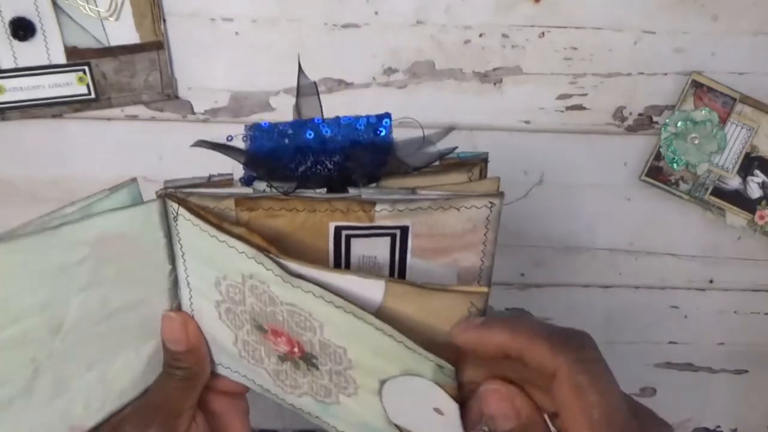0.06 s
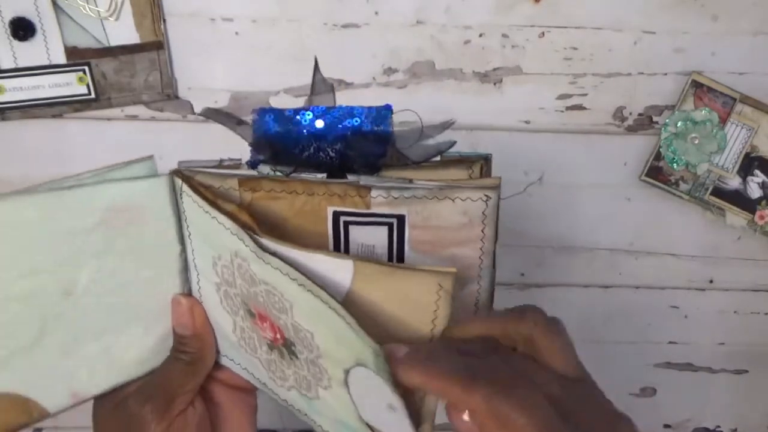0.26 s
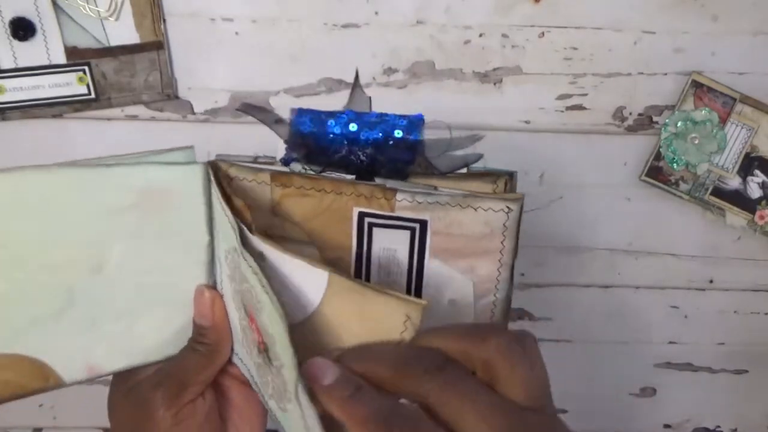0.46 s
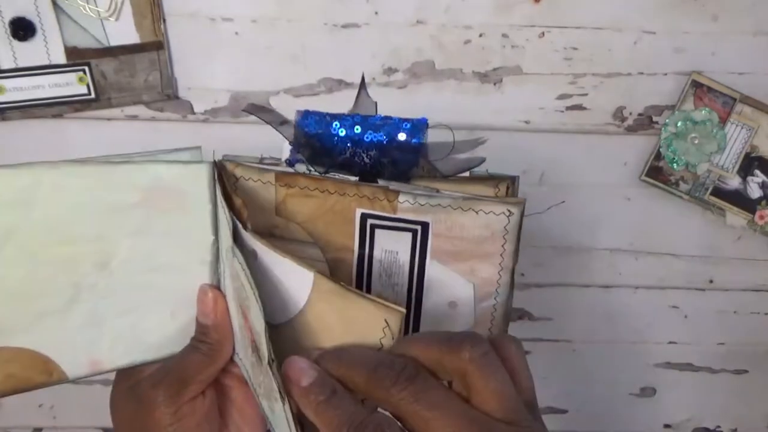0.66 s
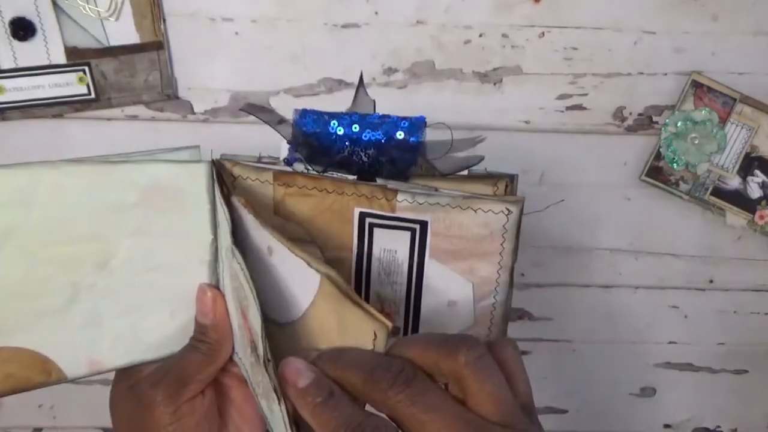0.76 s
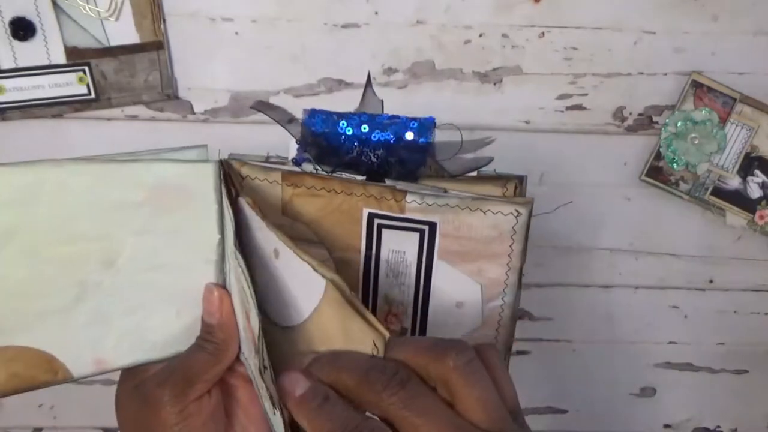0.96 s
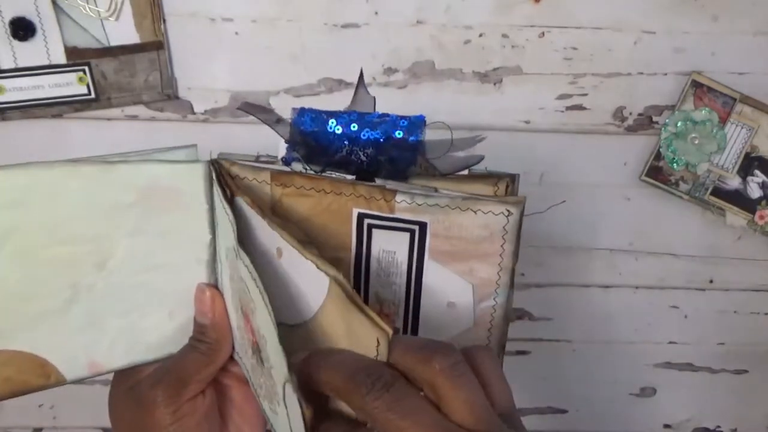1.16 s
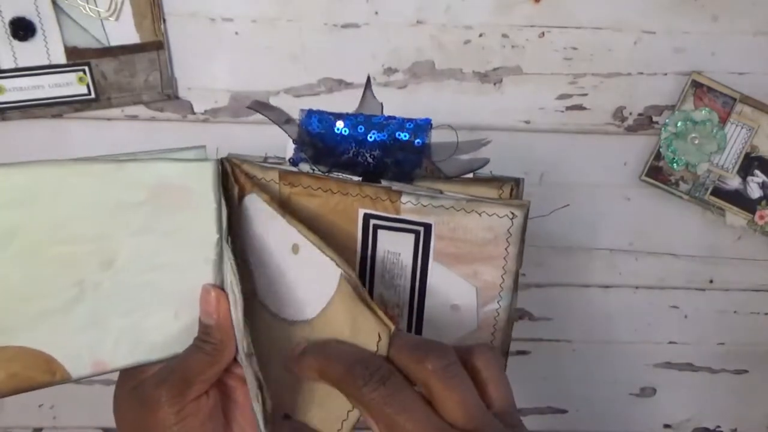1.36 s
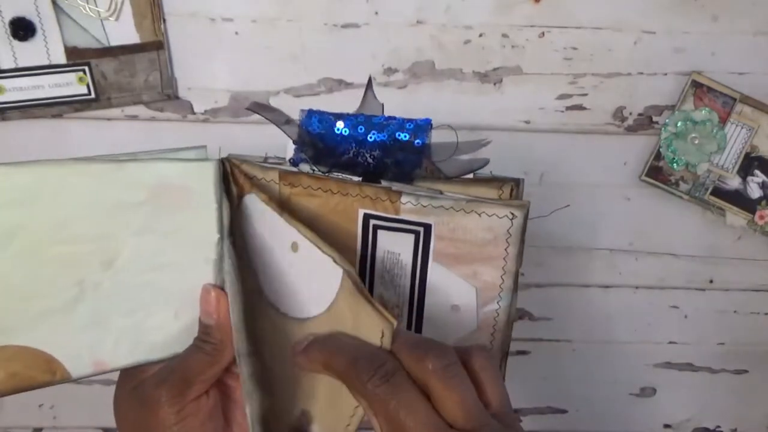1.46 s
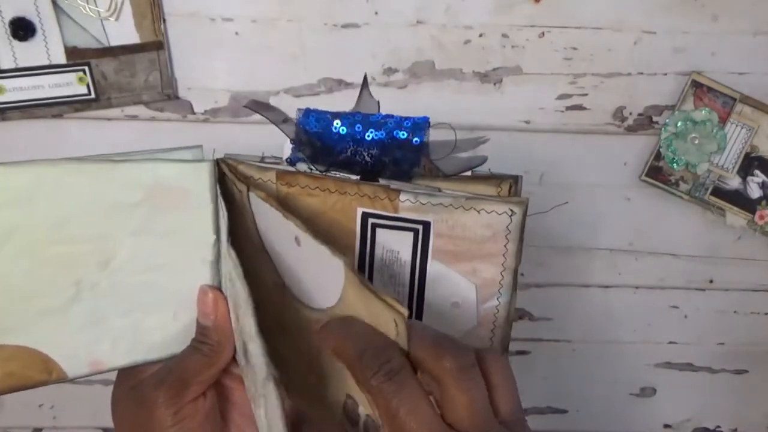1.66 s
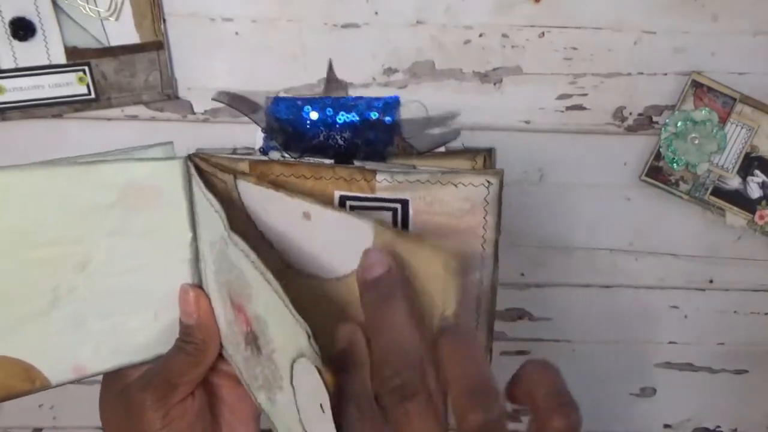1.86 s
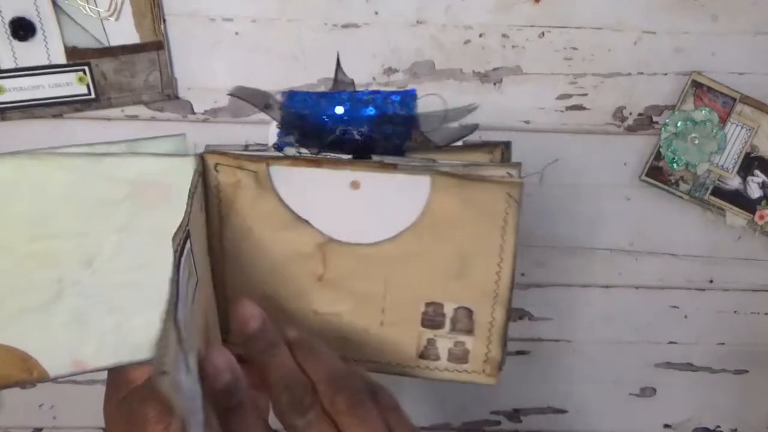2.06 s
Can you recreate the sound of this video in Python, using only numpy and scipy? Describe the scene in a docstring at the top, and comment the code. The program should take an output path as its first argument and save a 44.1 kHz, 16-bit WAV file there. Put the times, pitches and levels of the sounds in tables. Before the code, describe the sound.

Thick journal paper rustles under hands. A short brushing stroke opens, then soft rubbing with a light snap at 0.4 s. A tight crisp crackle comes at 0.75-0.83 s, then quiet sliding. From 1.23 s creases tick, growing into dense snaps, knocks and hissy rubs at 1.37-1.6 s. Faint sliding follows until a bright flick near 2 s and a soft low thump. Small room, close phone, faint hum.

```python
"""Thick paper pages and flaps of a journal are rubbed, flipped and folded by hand under a phone in a small room.
Sliding strokes are dense random grains through resonances: dull scrape, sheet, fine hiss; some sing on one note.
Creases snap as clicks with ragged tails that ring the sheet; covers and flaps knock as decaying sines.
Noise tails make the room; shaped noise makes the air rumble and narrow noise a wavering hum."""
import sys
import numpy as np
from scipy import signal
from scipy.fft import rfft, irfft
from scipy.io import wavfile
from scipy.ndimage import uniform_filter1d

SR = 44100
rng = np.random.default_rng(int(sys.argv[2]) if len(sys.argv) > 2 else 0)


def log_audio(samples):
    """Write samples as a 16-bit WAV file to the path given in sys.argv[1]."""
    # one column per channel
    frames = np.atleast_2d(samples).T
    # limit to full scale, then quantise
    limited = np.clip(frames, -1, 1)
    pcm = np.round(limited * 32767).astype(np.int16)
    wavfile.write(sys.argv[1], SR, pcm)


N = 92786


def undb(db):
    """dB to amplitude gain."""
    return 10 ** (np.asarray(db) / 20)


def unit(x):
    """Scaled to rms 1."""
    return x / np.sqrt(np.mean(x ** 2))


def band(x, hz, width_hz):
    """Two-pole resonance, gain 1 at the centre."""
    q = hz / max(width_hz, 1.)
    b, a = signal.iirpeak(min(hz, .45 * SR), q, SR)
    return signal.lfilter(b, a, x)


def walk(rate_hz):
    """Random levels held 1 / rate_hz s and slewed; rms 1."""
    k = int(SR / rate_hz)
    levels = rng.standard_normal(N)[:N // k + 1]
    return unit(uniform_filter1d(np.repeat(levels, k), k)[:N])


GRAINS_PER_S, GRAIN_SPREAD_DB = 9000, 2.0
FLICKER_DB, FLICKER_RATE_HZ = 1.54, 60.09


def grains():
    """Fibres catching and letting go: dense tiny clicks of uneven size."""
    happens = rng.random(N) < GRAINS_PER_S / SR
    size = undb(GRAIN_SPREAD_DB * rng.exponential(size=N))
    sign = np.sign(rng.standard_normal(N))
    return unit(happens * sign * size) * undb(FLICKER_DB * walk(FLICKER_RATE_HZ))


def grain_band(hz, width_hz):
    """Fresh grains through three stacked resonances, for steep skirts; rms 1."""
    x = band(grains(), hz, width_hz)
    x = band(x, hz, 2.08 * width_hz)
    return unit(band(x, hz, 2.57 * width_hz))


# Sliding strokes. Each row: start of full level in seconds, swell in ms, hold in ms, fade in ms,
# dull scrape in Hz, scrape level in dB, sheet resonance in Hz, sheet level in dB, fine hiss level in dB.
STROKES = [(0.0, 20, 66, 43, 1590, -51.5, 3800, -43.5, -41.5),
           (.155, 51, 18, 54, 1420, -58.5, 3620, -56, -52.5),
           (.215, 12, 8.3, 9.6, 1400, -68, 3970, -56, -48.5),
           (.265, 52, 37, 18, 1000, -58, 3400, -46, -45.5), (0.31, 12, 20, 59, 975, -56, 3660, -46, -42.5),
           (.375, 99, 33, 88, 1450, -53, 3560, -45, -46.5),
           (0.451, 33, 66, 160, 1380, -54.5, 3070, -52.5, -60.5),
           (.55, 56, 31, 18, 1290, -62, 3100, -66, -85),
           (0.622, 5.6, 99, 19, 1220, -51, 2780, -55.5, -62.5),
           (.752, 4.8, 18.2, 17, 915, -39, 4000, -40.5, -39),
           (0.829, 17, 20, 126, 1070, -56, 4480, -47.5, -38.5),
           (1.02, 33, 17, 77, 1240, -63, 2980, -55.5, -53.5),
           (1.119, 175, 77, 140, 1300, -63, 3150, -52.5, -43.5),
           (1.24, 19, 32, 72, 1020, -58, 2980, -58, -60),
           (1.291, 74, 56, 42, 1320, -58, 4200, -54.5, -53.5),
           (1.368, 20, 34, 92, 1110, -44.5, 4260, -49, -43.5),
           (1.45, 18, 5.3, 28, 1200, -43.5, 4000, -47, -44),
           (1.477, 26, 19.5, 22, 940, -44, 4700, -44.5, -36.5),
           (1.535, 52, 35, 65, 1340, -41.5, 4670, -37.5, -35),
           (1.565, 14, 5.9, 120, 1730, -42.5, 3900, -49, -40.5),
           (1.756, 103, 78, 76, 1560, -60.5, 3770, -59, -44),
           (1.851, 14, 22.4, 52, 1720, -55, 4100, -57, -44),
           (1.971, 57, 18, 13, 1200, -71, 4500, -57.5, -53.5),
           (1.9872, 1.0, 8.4, 5, 1900, -51, 5070, -28, -24.5),
           (2.0, 4.5, 8.7, 117, 1490, -54.5, 4960, -40.5, -40)]
STROKE_EDGE_DB = -28  # level one swell before the hold, one fade after it
SCRAPE_WIDTH, SHEET_WIDTH = 1, 0.62  # shares of the resonance
HISS_HZ, HISS_WIDTH_HZ = 8510, 3470


def rubbing():
    """Each stroke swells, holds and fades; its grains sound dull, in the sheet and fine."""
    t, low, high = np.arange(N) / SR, 0, 0
    hiss = grain_band(HISS_HZ, HISS_WIDTH_HZ)
    for start_s, swell_ms, hold_ms, fade_ms, scrape_hz, scrape_db, sheet_hz, sheet_db, hiss_db in STROKES:
        before = 1000 * (start_s - t) / max(swell_ms, 1.)
        after = (1000 * (t - start_s) - hold_ms) / max(fade_ms, 1.)
        env = undb(STROKE_EDGE_DB * np.maximum(np.maximum(before, after), 0))
        scrape = undb(scrape_db) * grain_band(scrape_hz, SCRAPE_WIDTH * scrape_hz)
        sheet = undb(sheet_db) * grain_band(sheet_hz, SHEET_WIDTH * sheet_hz)
        low = low + env * (scrape + sheet)
        high = high + env * undb(hiss_db) * hiss
    return low, high


# Narrow notes of the sheet under the fingers. Each row: start in seconds, length in ms, note in Hz, level in dB.
SINGING = [(.262, 52, 2960, -55.5), (.31, 31, 2995, -50), (.383, 30, 3030, -50), (1.56, 17.5, 2000, -39.5),
           (2.003, 18, 5770, -33)]
SINGING_WIDTH = 0.025  # share of the note


def singing():
    """Sliding grains feed one narrow mode of the taut sheet for a moment."""
    t, out = np.arange(N) / SR, 0
    for start_s, length_ms, hz, db in SINGING:
        phase = np.clip(1000 * (t - start_s) / length_ms, 0, 1)
        env = np.sin(np.pi * phase) ** .5
        note = unit(band(grains(), hz, SINGING_WIDTH * hz))
        out = out + undb(db) * env * note
    return out


def peak_unit(x):
    """Scaled so the loudest 50-sample stretch has rms 1."""
    return x / np.sqrt(uniform_filter1d(x ** 2, size=50).max())


# Creases snapping. Each row: nominal time in seconds, crack level in dB before CRACK_TRIM_DB,
# low ring in Hz, its level in dB before RING_TRIM_DB, high ring in Hz, its level in dB before RING_TRIM_DB,
# nominal length in ms (the tail's decay time is LENGTH_SHARE of it).
SNAPS = [(0.0648, -55, 1160, -46, 4220, -40.5, 4.4), (0.2234, -43.5, 2380, -52.5, 4150, -48.5, 3.2),
         (0.3896, -46, 1560, -48, 3150, -39, 1.1), (0.4006, -30.5, 1490, -35, 3170, -39, 1.94),
         (0.4087, -54, 1460, -44, 3100, -43, 2.4), (0.582, -53.5, 1510, -50.5, 3480, -51, 1.1),
         (0.7266, -57, 1350, -48, 2660, -42.5, 3.1), (0.7312, -58, 1340, -42, 2840, -43, 0.92),
         (0.7535, -32.5, 1540, -35, 2660, -38, 3.9), (0.7557, -34, 1600, -43, 2780, -37, 1.8),
         (0.7621, -60, 1030, -32, 1490, -33, 0.5), (0.7628, -28, 665, -40, 2800, -33, 0.4),
         (0.7651, -25, 970, -49, 4760, -37.5, 0.36), (0.769, -30, 1450, -34, 4470, -38, 0.92),
         (0.7752, -46, 682, -45, 1300, -45, 0.49), (0.8129, -28, 1600, -47, 2740, -44, 0.59),
         (0.8157, -27, 1000, -47, 6100, -41, 0.31), (0.8163, -22, 1790, -42, 4520, -40, 0.3),
         (0.8174, -16, 1460, -37, 2800, -34.5, 0.42), (0.8203, -21.5, 1570, -45, 2950, -35, 0.32),
         (0.8252, -15.5, 1440, -38, 2920, -30.5, 0.34), (0.831, -28, 1140, -41, 5400, -39, 0.6),
         (1.2285, -33, 1670, -44, 2710, -53, 0.71), (1.2384, -57, 970, -42.5, 3230, -51, 2.1),
         (1.2786, -34.5, 1567, -45, 2800, -49.5, 0.75), (1.281, -30, 2410, -52, 2730, -40, 0.37),
         (1.298, -26, 2350, -46, 2830, -43, 1.7), (1.3384, -32.5, 2390, -53, 2760, -45, 0.43),
         (1.3588, -38, 520, -65, 5150, -40, 1.7), (1.3616, -41, 466, -41, 4260, -45, 1.8),
         (1.3675, -31, 526, -64, 4100, -36, 1.3), (1.3776, -17, 1200, -28.5, 2700, -28.5, 0.84),
         (1.3777, -29.5, 1950, -31, 4170, -25.5, 0.56), (1.3778, -40, 5530, -25.5, 10000, -20.5, 1.2),
         (1.3879, -34, 1220, -50, 3100, -38, 2.0), (1.3974, -26.5, 1910, -38, 4080, -37.5, 1.4),
         (1.4477, -53, 1290, -44, 2410, -41, 1), (1.452, -26, 1800, -43, 4400, -35.5, 1.1),
         (1.464, -48, 1010, -32.5, 2410, -48, 1.4), (1.4729, -22, 1740, -26.5, 4420, -18.5, 0.29),
         (1.473, -42, 5330, -40, 7260, -14.5, 0.67), (1.4758, -20.5, 670, -36, 4260, -57, 0.18),
         (1.4852, -33, 2100, -31, 4630, -50, 0.55), (1.5097, -34, 750, -41.5, 5120, -41, 0.45),
         (1.5204, -25, 1640, -60, 5040, -46, 0.62), (1.5233, -18, 1530, -28.5, 5100, -23.5, 1.25),
         (1.5267, -17.5, 2030, -29, 2870, -35, 1.8), (1.5397, -36, 2120, -26.5, 5200, -28, 2.4),
         (1.572, -41, 1900, -41, 4300, -28, 4.5), (1.5775, -32, 1700, -29, 3120, -29, 1.25),
         (1.586, -37, 1860, -41, 2980, -43, 1.4), (1.86, -43, 2000, -54, 4200, -44.5, 1.5),
         (1.8637, -33.5, 2410, -45, 2600, -46, 1.9), (1.9467, -50, 1600, -51, 3220, -54, 0.39),
         (1.9879, -22, 4260, -21.5, 7420, -22, 2.8), (1.991, -24, 2140, -37.5, 5600, -20.5, 6.6),
         (1.9926, -32, 1520, -35.5, 5720, -16, .7), (1.9957, -27, 4320, -24, 5950, -20, 1.8),
         (2.003, -34, 2280, -46, 5760, -26, 1.3), (2.0157, -36, 1770, -66, 5500, -34, 0.69),
         (2.0418, -52, 700, -54, 4770, -36, 0.5)]
SNAP_SAMPLES, SNAP_LATE_S = 2048, .0003
CRACK_TRIM_DB, RING_TRIM_DB, LENGTH_SHARE = 4.5, -0.5, 0.64
CLICK_DB = 10.5  # first sample against the ragged tail, for a 1 ms snap
CRACK_HZ, CRACK_WIDTH_HZ = 9010, 2800
BROAD_HZ, BROAD_WIDTH_HZ, BROAD_DECAY_S, BROAD_DB = 4970.0, 1800.0, 0.00025, -11.5  # dB re crack
RING_WIDTH_HZ = 430
RING_SKIRT = 0.44  # width of the second, steepening resonance as a share of the ring


def ring(burst, hz):
    """One mode of the sheet excited by the burst."""
    return peak_unit(band(band(burst, hz, RING_WIDTH_HZ), hz, RING_SKIRT * hz))


def snaps():
    """A sharp click with a short ragged tail excites a bright crack and two rings of the sheet."""
    low, high = np.zeros(N + SNAP_SAMPLES), np.zeros(N + SNAP_SAMPLES)
    t = np.arange(SNAP_SAMPLES) / SR
    for start_s, crack_db, low_hz, low_db, high_hz, high_db, length_ms in SNAPS:
        noise = rng.standard_normal(SNAP_SAMPLES)
        burst = noise * np.exp(-t / (max(length_ms, .1) * LENGTH_SHARE / 1000))
        burst[0] = -undb(CLICK_DB) / max(length_ms, .3) ** 1.2  # shorter snaps click harder
        crack = peak_unit(band(band(burst, CRACK_HZ, CRACK_WIDTH_HZ), CRACK_HZ, 2 * CRACK_WIDTH_HZ))
        broad = peak_unit(band(noise * np.exp(-t / BROAD_DECAY_S), BROAD_HZ, BROAD_WIDTH_HZ))
        at = int((start_s + SNAP_LATE_S) * SR) + np.arange(SNAP_SAMPLES)
        high[at] += undb(crack_db + CRACK_TRIM_DB) * (crack + undb(BROAD_DB) * broad)
        low[at] += undb(low_db + RING_TRIM_DB) * ring(burst, low_hz)
        low[at] -= undb(high_db + RING_TRIM_DB) * ring(burst, high_hz)
    return low[:N], high[:N]


# Covers and flaps knocking softly. Each row: start in seconds, pitch in Hz,
# level in dB before rise, decay and a gain of 2, rise time in ms, decay time in ms.
THUMPS = [(0.4, 302, -38, 1.2, 6.6), (0.763, 542, -42.5, 2.8, 8.2), (0.759, 330, -49, 5.2, 10.4),
          (.816, 206, -50.5, 3, 10), (.817, 634, -47, 1.4, 7.2), (1.237, 952, -45.5, 0.84, 7),
          (1.371, 316, -47, 4.2, 12.7), (1.473, 673, -31.5, 0.68, 3.6), (1.4729, 432, -36.5, 0.95, 2.6),
          (1.377, 605, -37.5, 1.6, 2.7), (1.47, 222, -38.5, 3.5, 6.4), (1.576, 277, -41.5, 2.9, 4.9),
          (2.04, 133.5, -46.5, 12, 22), (2.045, 208, -51, 9.8, 28), (2.055, 272, -47.5, 9.3, 15)]


def thumps():
    """A soft push rings the stiff card for a few cycles."""
    out = 0
    for start_s, hz, db, rise_ms, decay_ms in THUMPS:
        t = np.maximum(np.arange(N) / SR - start_s, 0)
        env = (1 - np.exp(-1000 * t / rise_ms)) * np.exp(-1000 * t / decay_ms)
        out = out + 2 * undb(db) * env * np.sin(2 * np.pi * hz * t)
    return out


# Reverberation of the room. Each row: band centre in Hz, time to fall 60 dB in seconds.
ROOM_T60 = [(700, 0.33), (2000, 0.35), (4500, 0.24), (9000, 0.084)]
ROOM_SAMPLES, ROOM_BAND_WIDTH = 22050, 0.83  # width as a share of the centre
ROOM_DB, ROOM_DELAY_S, ROOM_SIDE_DB = -13, .004, -4  # side re mid


def room_tail():
    """Decaying noise in bands, scaled to energy 1, then silenced up to the first reflection."""
    t, tail = np.arange(ROOM_SAMPLES) / SR, 0
    for hz, t60_s in ROOM_T60:
        noise = band(rng.standard_normal(ROOM_SAMPLES), hz, ROOM_BAND_WIDTH * hz)
        tail = tail + noise * undb(-60 * t / t60_s)
    return tail * (t > ROOM_DELAY_S) / np.sqrt(np.sum(tail ** 2))


def room(x):
    """Decaying reflections, each band with its own reverberation time."""
    mid, side = room_tail(), undb(ROOM_SIDE_DB) * room_tail()
    left = signal.fftconvolve(x, mid + side)[:N]
    right = signal.fftconvolve(x, mid - side)[:N]
    return undb(ROOM_DB) * np.array([left, right])


def coloured(points):
    """Noise with a spectrum of (Hz, dB) points, interpolated over log frequency."""
    f, p = np.fft.rfftfreq(N, 1 / SR) + 1, np.array(points, float)  # + 1 avoids log 0
    gain = undb(np.interp(np.log(f), np.log(p[:, 0]), p[:, 1]))
    return irfft(rfft(rng.standard_normal(N)) * gain, N)


# Narrow noise bands of the wavering hum. Each row: centre in Hz, width in Hz, level in dB before HUM_SIDE_DB.
HUM = [(64, 4.8, -65.5), (121.5, 8.9, -58.5), (312.2, 13, -66.5)]
HUM_SIDE_DB = -23  # for the side only


def hum():
    """Noise in narrow resonances wavers in level and phase."""
    return sum(undb(db) * unit(band(rng.standard_normal(N), hz, width_hz)) for hz, width_hz, db in HUM)


# Spectrum shape of the room air. Each row: frequency in Hz, relative density in dB per Hz.
AIR = [(15, -18), (30, -8), (62, -5), (90, -12.5), (140, -1), (240, -4), (330, -10), (450, -9.5),
       (1500, -14), (2200, -19), (3500, -18.5), (6300, -19.5), (9200, -19), (11000, -37.5)]
# Side of the room air under its mid. Each row: frequency in Hz, side re mid in dB.
AIR_SIDE_DB = [(40, -29), (130, -21), (300, -7.5), (2000, -2.5), (9000, -6.5)]
AIR_DB, AIR_WANDER_DB, AIR_WANDER_RATE_HZ = -55.5, 0.75, 5.1


def background():
    """Room air and a wavering hum, nearly alike left and right in the bass."""
    p, q = np.array(AIR, float), np.array(AIR_SIDE_DB, float)
    side_db = p[:, 1] + np.interp(np.log(p[:, 0]), np.log(q[:, 0]), q[:, 1])
    air_mid, air_side = coloured(AIR), coloured(np.c_[p[:, 0], side_db])
    level = undb(AIR_DB + AIR_WANDER_DB * walk(AIR_WANDER_RATE_HZ))
    gain = level / np.sqrt(np.mean(air_mid ** 2))
    mid = gain * air_mid + hum()
    side = gain * air_side + undb(HUM_SIDE_DB) * hum()
    return np.array([mid + side, mid - side])


def pan(x, db):
    """Left louder than right by db."""
    return x * undb(np.array([[db], [-db]]) / 2)


PAN_DB, TREBLE_PAN_DB = 1, 2
RUB_SIDE_DB, RUB_SIDE_LAG_SAMPLES = -20, 31


def scene():
    """The journal sits a little left of the phone; the room answers all of it but the thumps."""
    rub_low, rub_high = rubbing()
    snap_low, snap_high = snaps()
    low = rub_low + snap_low + singing()
    high = rub_high + snap_high
    late_rub = np.roll(rub_low + rub_high, RUB_SIDE_LAG_SAMPLES)
    spread = undb(RUB_SIDE_DB) * late_rub * np.array([[1], [-1]])  # opposite sign left and right
    direct = pan(low + thumps(), PAN_DB) + pan(high, TREBLE_PAN_DB)
    return direct + spread + room(low + high) + background()


MIC_DIP_HZ, MIC_DIP_WIDTH_HZ, MIC_DIP_SHARE = 7250, 4300, 0.39
TOP_HZ = 11050


def record(dry):
    """The microphone dips around MIC_DIP_HZ and the phone cuts steeply above TOP_HZ."""
    dipped = dry - MIC_DIP_SHARE * band(dry, MIC_DIP_HZ, MIC_DIP_WIDTH_HZ)
    lowpass = signal.firwin(401, TOP_HZ, window=("kaiser", 5), fs=SR)
    return signal.fftconvolve(dipped, lowpass[None], "same", axes=1)


dry = scene()
out = record(dry)
log_audio(out)
```